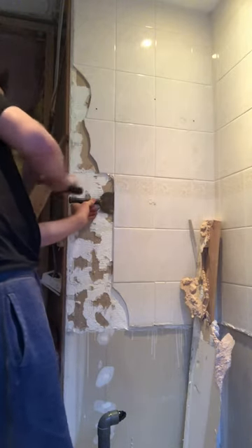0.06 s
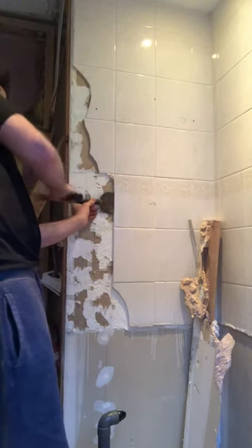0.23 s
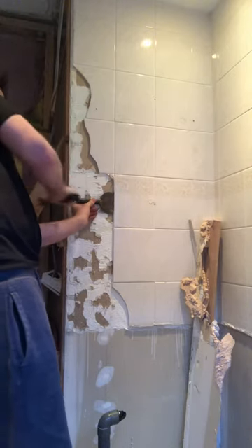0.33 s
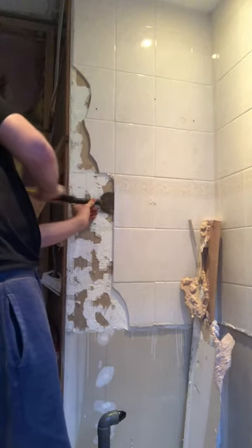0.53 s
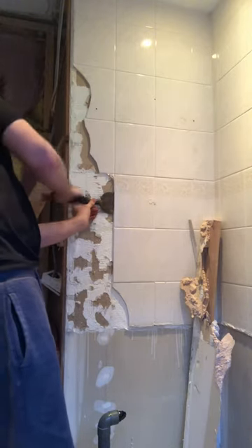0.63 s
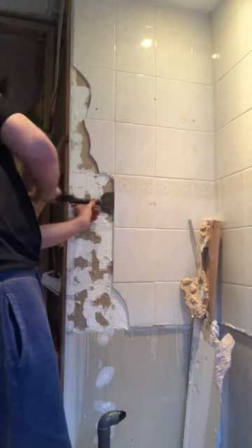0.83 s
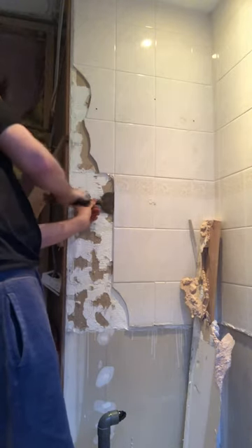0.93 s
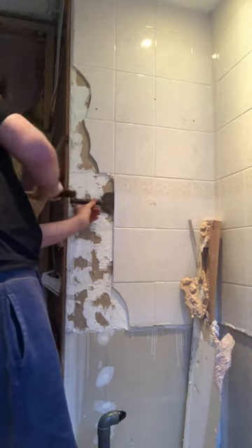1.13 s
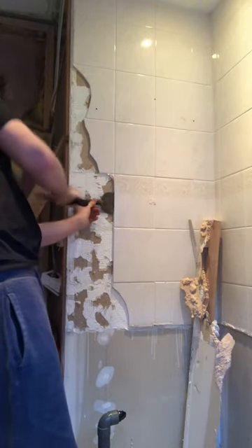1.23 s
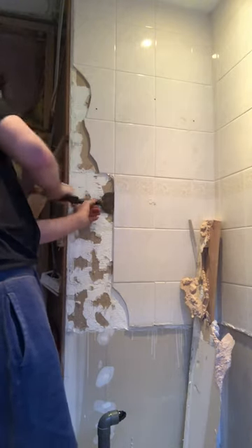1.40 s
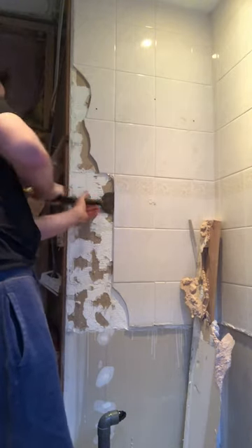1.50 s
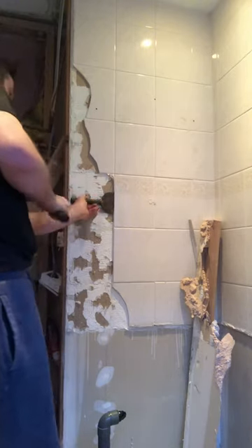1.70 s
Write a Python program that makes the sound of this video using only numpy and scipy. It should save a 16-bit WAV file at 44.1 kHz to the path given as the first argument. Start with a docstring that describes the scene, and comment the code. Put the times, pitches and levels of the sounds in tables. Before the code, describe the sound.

A hammer strikes a steel chisel against a tiled wall in a small echoing room.

```python
"""In a small bare room, a hammer drives a steel chisel into a tiled wall, three blows a second.
Each blow cracks, rings the steel and sets the wall booming, and the room echoes it.
Crumbs of plaster and tile drop in between, with two soft bumps, over a low murmur.
A limiter (an automatic volume control) flattens the loud start of the blows."""
import sys
import numpy as np
from scipy import signal
from scipy.fft import rfft, irfft, next_fast_len
from scipy.io import wavfile
from scipy.ndimage import uniform_filter1d, minimum_filter1d

SR = 44100
rng = np.random.default_rng(int(sys.argv[2]) if len(sys.argv) > 2 else 0)


def wav_out(sig):
    """Save sig, one row per channel (or a flat mono array), as 16-bit PCM at SR to the path in sys.argv[1]."""
    wavfile.write(sys.argv[1], SR, np.round(np.clip(np.atleast_2d(sig).T, -1, 1) * 32767).astype(np.int16))


N = 77175
T = np.arange(SR * 3 // 4) / SR  # seconds since one sound began


# Hammer blows: start_s, force_db, thump_db, steel_db, brightness_db_per_octave, echo_db, boom_db, zing_db
BLOWS = [(-0.09, -18, -28, -6, -3, -4.5, -3, -22), (0.2385, -8, -0.5, 2.5, -2, -7, 0.5, 2.5),
         (0.5816, -6, 0, -1.5, -2, 6, 0.5, 5), (0.9092, -5.5, -4, -4, -1.68, 2.5, 3.5, 7.5),
         (1.2405, -5.5, -1.5, -5, -1, -6.5, 0.5, -4.5)]

def hammer():
    """Each blow shakes the chisel, tile, wall and room. The chisel zings more when its edge bites."""
    out = np.zeros(N)
    for start_s, force_db, thump_db, steel_db, brightness, echo_db, boom_db, zing_db in BLOWS:
        def tone(hz):
            zing = np.exp(-((hz - 10800) / 570) ** 2)
            return amp(brightness * np.log2(1 + hz / 1500) + zing_db * zing)
        hit = amp(14.5) * crack() + amp(1.5) * room_wash()
        hit += amp(echo_db - 11.5) * late_echo() + amp(steel_db - 10.5) * steel_ring()
        add(out, start_s - 0.0225, amp(-43) * early_tick())
        add(out, start_s, amp(force_db) * (filtered(hit, tone) + amp(thump_db) * wall_thump()))
        add(out, start_s + 0.00036, amp(force_db + 14.5) * strike_ring())
        add(out, start_s + 0.006, amp(force_db - 3.5) * wall_ring())
        add(out, start_s + 0.03, amp(force_db + boom_db) * room_boom(rise_s=0.03, width_hz=2.6))
    return out


# The crack's tone, low to high: pitch_hz, level_db
CRACK_TONE = [(100, -27.5), (400, -5.5), (800, 6), (1400, -0.5), (2200, 1), (3300, -12.5), (4500, -7.5),
              (7000, -11.5), (8100, -8.5), (9300, -19.5), (10900, -12), (12000, -16), (13000, -25.5),
              (15500, -17.5)]

def crack():
    """The tile cracks in one very short burst of noise."""
    return envelope(rise_s=0.0015, fade_s=0.022) * noise(CRACK_TONE, len(T))


# Short notes of the tile and the steel chisel: pitch_hz, level_db, fade_s
STRIKE_NOTES = [(797, -3.5, 0.027), (1345, -1.5, .028), (1972, -5.5, 0.015), (2310, 0.5, 0.013),
                (4380, -9, 0.028), (10670, -12.5, 0.021)]

def strike_ring():
    """The tile and the steel chisel ring together, briefly and roughly."""
    return ring(STRIKE_NOTES, rise_s=0.0022, width_hz=90)


# Notes of the chisel and hammer head: pitch_hz, level_db
STEEL_NOTES = [(1975, 1.5), (4380, 3), (4470, -21), (5280, -17.5), (5730, -6), (6440, -5.5), (10500, -20),
               (10850, -16.5)]

def steel_ring(fade_s=0.225):
    """The struck steel rings with high notes that all fade equally fast."""
    return ring([(hz, db, fade_s) for hz, db in STEEL_NOTES], rise_s=0.00067, width_hz=25)


# Notes of the wall and the air in front of it: pitch_hz, level_db, fade_s
WALL_NOTES = [(113.3, -6.5, 0.31), (152.2, -7.5, 0.35), (183.4, -2, .26), (230.7, -2, .24),
              (292.4, -3, .24), (337.6, -5.5, .22), (373.5, -1, 0.23), (623.2, -8.5, 0.27),
              (678.4, -6.5, 0.2), (721, -5.5, 0.26), (830.3, -0.5, 0.18), (979, -5, 0.2), (1178, -6, 0.23),
              (1322, -12, 0.3), (1534, -12.5, 0.25)]

def wall_ring():
    """The shaken wall booms with many notes at once."""
    return ring(WALL_NOTES, rise_s=0.006, width_hz=2.5)


def wall_thump(thump_hz=235, sway_hz=46):
    """The wall gives way in one short thump and sways slowly after it."""
    from_peak_s = T - 0.01487
    thump = np.exp(-(from_peak_s / 0.0052) ** 2) * np.sin(2 * np.pi * thump_hz * from_peak_s)
    sway = envelope(rise_s=0.015, fade_s=0.22) * np.sin(2 * np.pi * sway_hz * T)
    return amp(7.5) * thump + amp(-10) * sway


# The tick's tone: pitch_hz, level_db
TICK_TONE = [(150, -0.5), (700, 3.5), (1500, 3), (3200, -11.5), (4500, -6), (6500, -20.5), (9000, -22),
             (10800, -14), (13000, -33.5)]

def early_tick():
    """A faint tick comes just ahead of each blow."""
    return envelope(rise_s=0.001, fade_s=0.047) * noise(TICK_TONE, len(T))


# The tone of a blow filling the room: pitch_hz, level_db
ROOM_TONE = [(30, -24.5), (100, 1), (270, 1), (480, -4.5), (800, -4), (1450, -3.5), (2300, -12.5),
             (3300, -14.5), (4000, -17.5), (4450, -9.5), (4900, -14.5), (6300, -15.5), (7200, -25),
             (8100, -18.5), (9400, -31.5), (10400, -19), (11000, -20), (11500, -25.5), (12000, -29),
             (12800, -42.5), (15500, -39)]

def room_wash():
    """The bare room answers a blow with a blur of echoes."""
    return reverberate(noise(ROOM_TONE, len(T)))


# How fast the room fills with sound: pitch_hz, rise_s
ROOM_RISE = [(60, 0.01), (250, 0.013), (800, 0.0082), (2500, 0.0033), (12000, 0.0017)]
# How long the sound lingers: pitch_hz, fade_s
ROOM_FADE = [(80, 0.25), (300, 0.29), (1400, 0.24), (4500, 0.23), (9000, 0.19), (15000, 0.24)]

def reverberate(x):
    """Steady noise swells and dies away as it does in the room; high pitches swell first."""
    hz, t, bands = signal.stft(x, SR, nperseg=256)
    rise_s = along(ROOM_RISE, hz)[:, None]
    fade_s = along(ROOM_FADE, hz)[:, None]
    _, tail = signal.istft(bands * envelope(rise_s, fade_s, t), SR, nperseg=256)
    return tail[:len(T)] * (1 - np.exp(-T / 0.0029))


# The late echo's tone: pitch_hz, level_db
ECHO_TONE = [(150, -21), (400, -7), (750, 9.5), (1400, -5), (2500, -18.5), (6000, -21), (15000, -38)]

def late_echo(delay_s=0.046, width_s=0.0092):
    """Sound bounces back from the far walls in one tight bunch."""
    return np.exp(-((T - delay_s) / width_s) ** 2) * noise(ECHO_TONE, len(T))


# The room's lowest note: pitch_hz, level_db, fade_s
BOOM_NOTE = [(90.5, 0, 0.2)]

def room_boom(rise_s, width_hz):
    """The air in the room slowly builds up one deep note."""
    return ring(BOOM_NOTE, rise_s, width_hz)


# Falling crumbs: start_s, level_db, pitch_hz, width_octaves, crispness_db
CRUMBS = [(0.102, -37, 630, 0.43, -57), (0.111, -36, 215, 0.93, -58), (0.512, -47, 880, 0.97, -21),
          (0.834, -48.5, 900, 1.5, -36), (1.554, -40.5, 747, 0.94, -45.5), (1.564, -38.5, 278, 0.61, -59.5),
          (1.595, -48.5, 1300, 0.78, -28), (1.724, -43, 1280, 0.68, -23.5), (1.740, -33.5, 698, 1.2, -39.5)]

def crumbs():
    """Each crumb lands with a short tick that echoes in the room."""
    out = np.zeros(N)
    for start_s, level_db, pitch_hz, width_octaves, crispness_db in CRUMBS:
        def tone(hz):
            return 1 / (1 + (np.log2((hz + 1) / pitch_hz) / width_octaves) ** 4) + amp(crispness_db)
        tick, room = (unit(filtered(rng.standard_normal(len(T)), tone)) for _ in range(2))
        tick *= envelope(rise_s=0.002, fade_s=0.092)
        add(out, start_s, amp(level_db) * (tick + amp(-6.5) * reverberate(room)))
    return out


# Soft bumps: start_s, level_db
BUMPS = [(0.103, -53), (1.577, -28)]

def bumps():
    """Soft bumps stir only the room's lowest note."""
    out = np.zeros(N)
    for start_s, level_db in BUMPS:
        add(out, start_s, amp(level_db) * room_boom(rise_s=0.017, width_hz=3))
    return out


# The background's tone: pitch_hz, level_db
MURMUR_TONE = [(20, 2), (40, -2.5), (90, 2.5), (200, 0), (330, -14), (600, -14.5), (1200, -20.5),
               (2500, -35), (6000, -40.5), (15000, -51.5)]

def murmur():
    """A low, steady noise fills the room."""
    return amp(-50) * noise(MURMUR_TONE, N)


def ring(notes, rise_s, width_hz):
    """Fading notes, each about 1 dB stronger or weaker by chance; more width makes them rougher."""
    out = np.zeros(len(T))
    for hz, db, fade_s in notes:
        drift = np.cumsum(rng.standard_normal(len(T))) * np.sqrt(2 * np.pi * width_hz / SR)
        phase = 2 * np.pi * (hz * T + rng.random()) + drift
        out += amp(db + rng.standard_normal()) * envelope(rise_s, fade_s) * np.sin(phase)
    return out


def envelope(rise_s, fade_s, t=T):
    """A soft start, then a fall of 60 dB every fade_s seconds."""
    return (1 - np.exp(-(t / rise_s) ** 2)) * np.exp(-np.log(1000) * t / fade_s)


def amp(db):
    """Turn decibels into a number to multiply by."""
    return 10 ** (np.asarray(db) / 20)


def unit(x):
    """Set a sound's average strength (rms) to 1."""
    return x / np.sqrt(np.mean(x ** 2) + 1e-20)


def along(points, hz):
    """Read a (pitch_hz, value) table between its rows."""
    pitches, values = np.transpose(points)
    return np.interp(np.log(hz + 1), np.log(pitches + 1), values)


def filtered(x, gain):
    """Turn each pitch up or down by gain(hz)."""
    size = next_fast_len(len(x) + 8192)
    return irfft(rfft(x, size) * gain(np.fft.rfftfreq(size, 1 / SR)), size)[:len(x)]


def noise(tone, size):
    """Noise of strength 1, shaped by a tone table."""
    return unit(filtered(rng.standard_normal(size), lambda hz: amp(along(tone, hz))))


def add(track, start_s, sound):
    """Mix a sound into the track at start_s."""
    i = round(start_s * SR)
    part = sound[max(-i, 0):max(N - i, 0)]
    track[max(i, 0):][:len(part)] += part


def scene():
    """Hammering, crumbs and bumps over the murmur, in one channel."""
    return (hammer() + crumbs() + bumps() + murmur())[None]


def record(dry):
    """A limiter turns down just before loud peaks and recovers; the deepest and highest sound is cut."""
    ceiling, release_s, ahead_samples = 0.9, 0.025, int(0.0012 * SR)
    low_hz, top_hz = 27, 16200
    excess = np.log(np.maximum(np.abs(dry[0]) / ceiling, 1))
    recovery = np.arange(N) / SR / release_s
    held = np.maximum.accumulate(excess + recovery) - recovery
    gain = minimum_filter1d(np.exp(-held), 2 * ahead_samples + 1)
    limited = dry[0] * uniform_filter1d(gain, ahead_samples)
    return filtered(limited, lambda hz: hz ** 4 / (hz ** 4 + low_hz ** 4) / (1 + (hz / top_hz) ** 80))[None]


dry = scene()
out = record(dry)
wav_out(out)
```